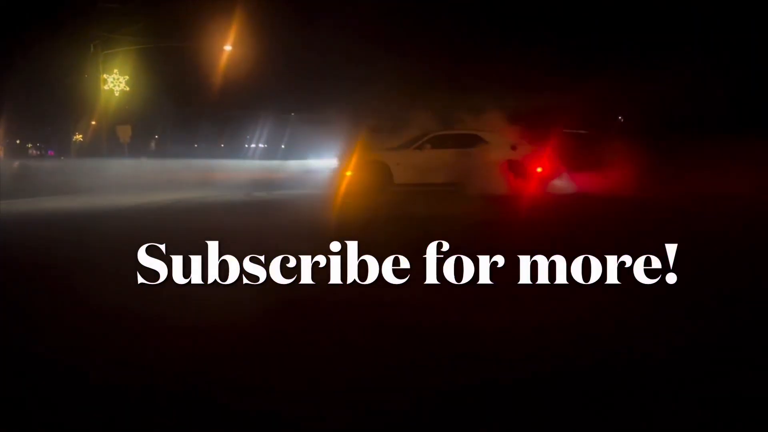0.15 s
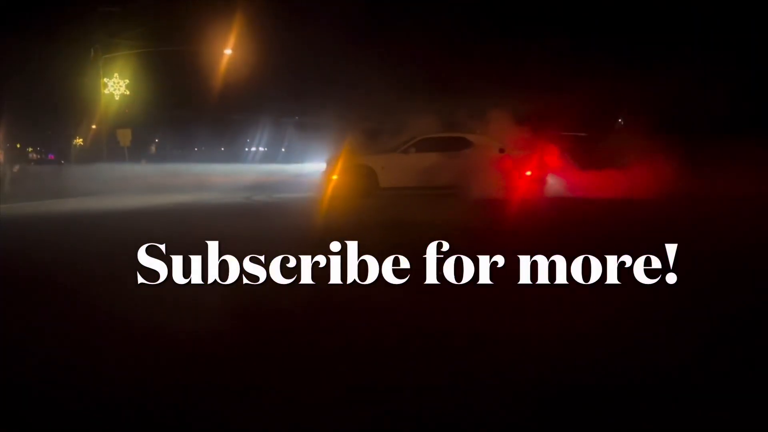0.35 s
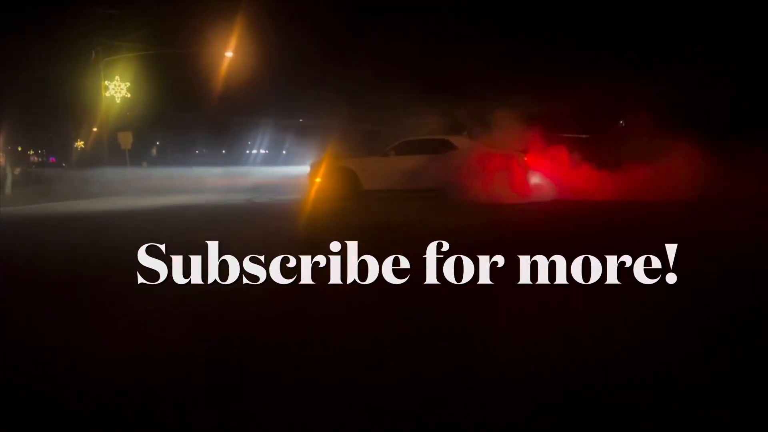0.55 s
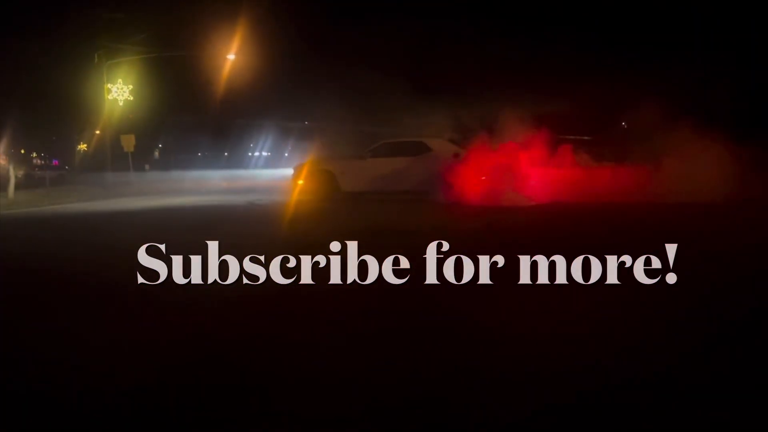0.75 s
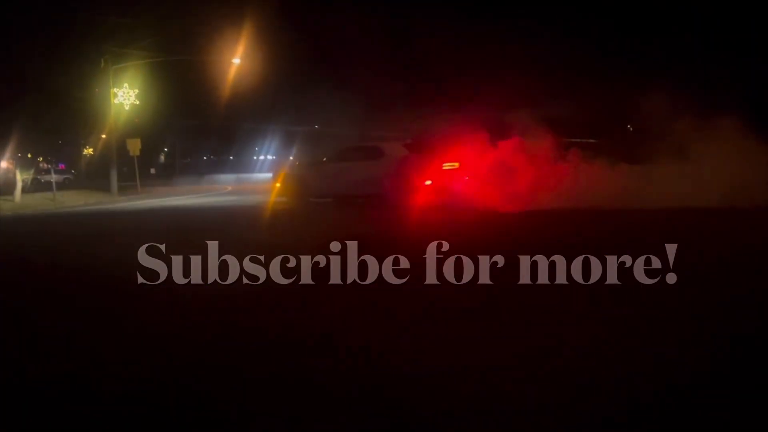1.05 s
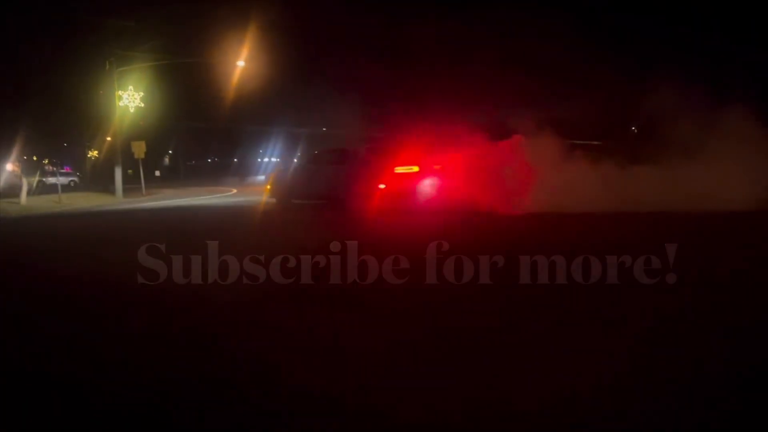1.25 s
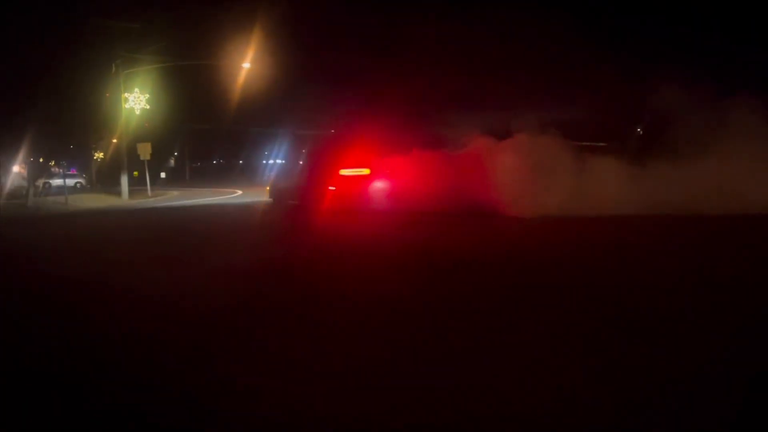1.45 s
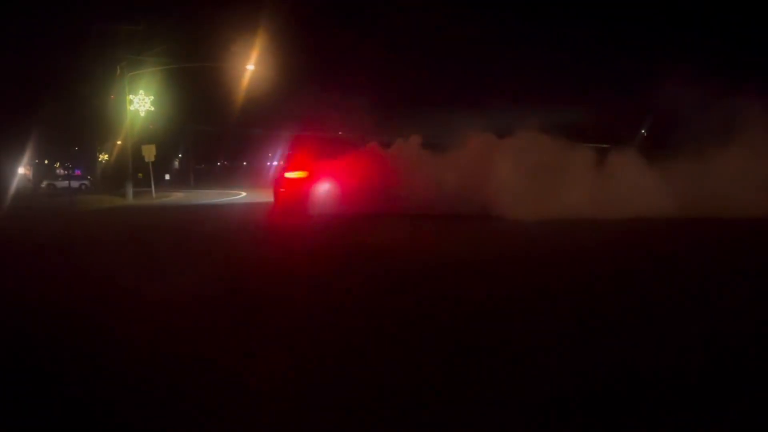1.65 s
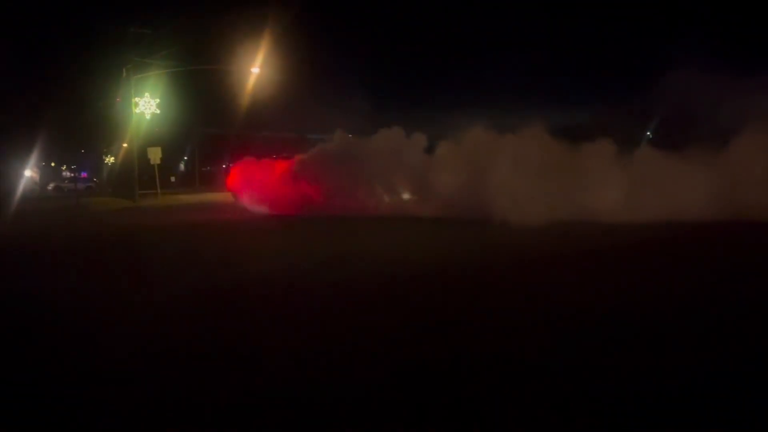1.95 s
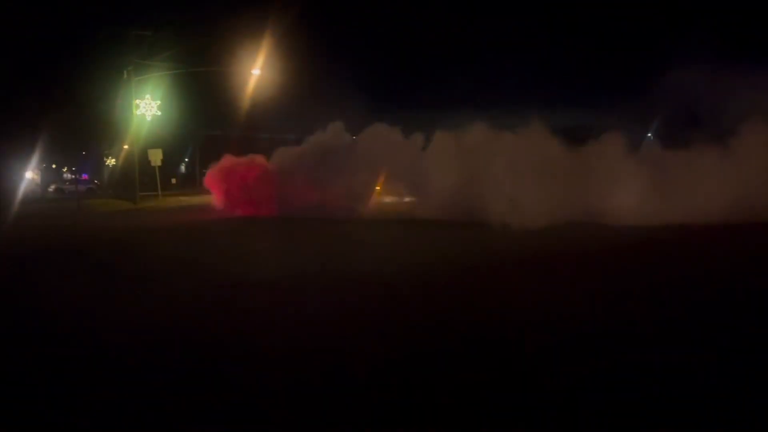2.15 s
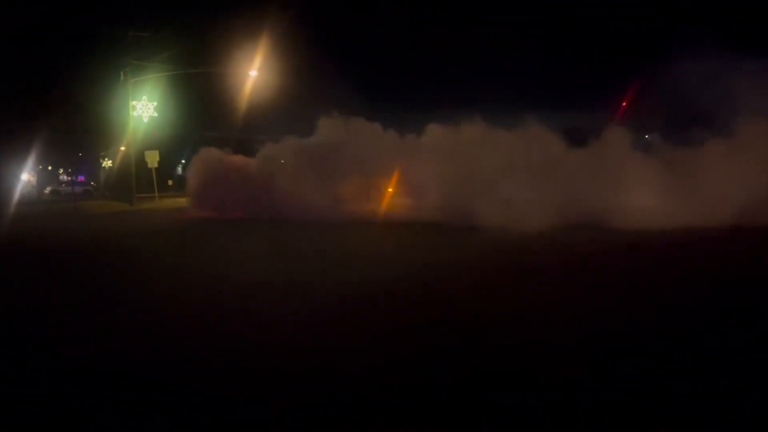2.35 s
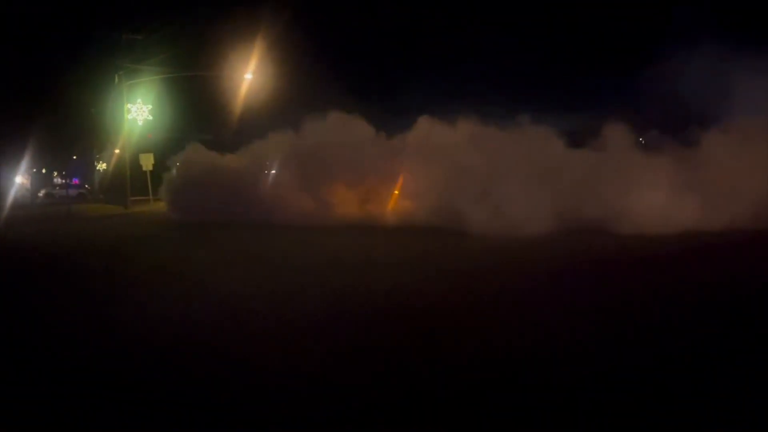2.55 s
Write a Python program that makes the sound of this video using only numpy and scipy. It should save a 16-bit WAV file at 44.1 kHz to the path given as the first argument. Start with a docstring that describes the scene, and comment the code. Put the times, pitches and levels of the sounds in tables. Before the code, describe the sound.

Loud V8 engine burnout with hissing, squealing tires, revs dropping to a deep boom, then climbing again

```python
"""A V8 vehicle does a burnout on a night street, some way from two microphones: summed exhaust lines and rasp puffs.
The revs sag with a low crank-rate throb, then hold; the tyres hiss (coloured noise) and squeal (hoarse wavering tones).
The vehicle slides off to the left; a tyre chirp (gliding tone) yelps as the throttle lifts.
The engine bogs down into a deep boom (pipe resonance) while the hiss fades, then the revs climb again.
Faint street noise lies under it all."""
import sys
import numpy as np
from scipy.fft import rfft, irfft, next_fast_len
from scipy.io import wavfile
from scipy.ndimage import map_coordinates

SR = 44100
rng = np.random.default_rng(int(sys.argv[2]) if len(sys.argv) > 2 else 0)


def digitize_waveform(pressure):
    """Quantize a signal to 16-bit integers and store it at the path in sys.argv[1].

    Rows of a 2-D input are taken as channels; values are limited to [-1, 1].
    """
    field = np.atleast_2d(pressure).T
    bounded = np.clip(field, -1, 1)
    quanta = np.round(bounded * 32767).astype(np.int16)
    wavfile.write(sys.argv[1], SR, quanta)


N = 119070

# engine speed: (time [s], mean firing rate [Hz])
FIRING_RATE_HZ = [(0, 394.2), (0.29, 413), (0.33, 396), (0.4, 353.5), (0.45, 315.4), (0.5, 296),
                  (0.6, 293.9), (0.71, 282.9), (1.19, 286.8), (1.3, 276.8), (1.46, 232.7), (1.53, 192.6),
                  (1.62, 158.7), (1.7, 146.2), (1.77, 146.2), (1.85, 151.4), (1.95, 171.1), (2.15, 212.4),
                  (2.25, 247.4), (2.45, 317), (2.55, 339.7), (2.62, 339.5), (2.7, 332.5)]
CYLINDERS = 8
# firing note before the pipe: (time [s], level [dB])
FIRING_NOTE_DB = [(0, -29), (.27, -26), (.48, -26.5), (.7, -28), (1.2, -28), (1.44, -50), (1.53, -56.5),
                  (1.62, -36.5), (1.78, -31.5), (1.92, -37), (2.05, -45), (2.2, -35), (2.33, -29),
                  (2.45, -21.5), (2.7, -35)]
# engine load, heard as burble: (time [s], level before the pipe [dB])
BURBLE_DB = [(0.0, -36.5), (0.27, -29), (0.4, -31.5), (0.6, -37), (0.75, -34), (1.1, -32.0), (1.3, -35.5),
             (1.48, -55.5), (1.85, -60), (2.1, -49), (2.3, -36.5), (2.45, -32.5), (2.55, -33), (2.63, -46),
             (2.7, -40.5)]
# exhaust lines on multiples 2, 3, 4 .. of the engine cycle, uneven from each bank: (relative level [dB])
LINE_DB = [1, 3.5, -4.5, .5, 1.5, -7.5, 0.5, 1, 3.5, -0.5, -1.5, -8.5, 2.5, 2, 0, 3.5, 6, -11.5, -8.5, 5.5,
           7, 3.5, -12.5, 8, 7]
# fixed exhaust pipe resonances: (frequency [Hz], gain [dB])
PIPE_GAIN_DB = [(50, 7), (75, 1), (110, 3.5), (135, -1), (160, -1.5), (195, 5.5), (228, -5), (255, 3.5),
                (275, 3), (305, 10), (355, 5.5), (390, -3), (425, -11), (460, 6), (500, -1), (560, -8),
                (600, 3), (640, 0.5), (700, -13), (800, -11.5), (1100, -17.5)]
# low exhaust resonance, strongest while the engine bogs down: (time [s], peak gain [dB])
DRONE_GAIN_DB = [(1.3, 0.5), (1.44, 24), (2.1, 24.5), (2.3, -3)]
DRONE_HZ, DRONE_WIDTH_HZ = 167.9, 38
# resonance that opens when the engine fires hard
BARK_MAX_DB, BARK_HZ, BARK_WIDTH_HZ = 11, 740, 74
# exhaust rasp: (time [s], rms level [dB])
RASP_LEVEL_DB = [(0, -29.5), (.25, -26), (.375, -22), (.55, -30), (.85, -33), (1.15, -29.5), (1.35, -37.5),
                 (1.55, -61.5), (1.9, -40.5), (2.2, -33), (2.45, -22.5), (2.56, -28), (2.7, -30.5)]
# rasp spectrum: (frequency [Hz], relative density [dB])
RASP_SPECTRUM_DB = [(50, -18), (200, -5), (330, 1.5), (430, -6), (660, -2), (900, -5), (1500, -6),
                    (3000, -22), (10000, -48)]
# low exhaust throb as the revs drop: (time [s], peak level [dB])
THROB_DB = [(.3, -26), (.43, -36), (.505, -16), (.54, -57.5)]
# tyre hiss before trim: (time [s], scrub level [dB], treble level [dB])
HISS_DB = [(0, -35, -41), (.55, -39, -43), (.95, -34, -40.5), (1.38, -32, -40), (1.7, -36.5, -49.5),
           (1.88, -52, -63), (2.1, -53, -59), (2.46, -45.5, -47.5), (2.7, -42.5, -55.5)]
SCRUB_TRIM_DB, TREBLE_TRIM_DB = 4.5, 4.5
# scrub spectrum: (frequency [Hz], relative density [dB])
SCRUB_SPECTRUM_DB = [(450, -19.5), (850, 1.5), (1600, -2), (2800, -3.5), (4300, -3), (5400, -9.5),
                     (8000, -24)]
# treble hiss spectrum: (frequency [Hz], relative density [dB])
TREBLE_SPECTRUM_DB = [(3500, -56), (6000, -2), (7000, -6.5), (8000, 1.5), (9800, -5.5)]
# tyre squeal: (time [s], centre pitch [Hz], level [dB])
SQUEAL_PITCH_LEVEL = [(0, 1149, -48.5), (.8, 1200, -43.5), (1.1, 1290, -29), (1.4, 1326, -35),
                      (1.55, 1246, -29.5), (1.92, 1199, -37.5), (2.1, 1177, -33), (2.7, 1175, -40)]
SQUEAL_WIDTH_HZ = 183
# brief tyre chirp: (time [s], mean pitch [Hz], fundamental level [dB])
CHIRP_PITCH_LEVEL = [(1.33, 695, -57), (1.37, 743, -23.5), (1.4, 780, -35), (1.44, 750, -79)]
# vehicle moved off to the left: (time [s], share [0-1])
OFF_AXIS_SHARE = [(.9, 0), (1.5, 0.46)]
# left microphone's lead for a source off to the left: (frequency [Hz], phase [rad])
LEFT_LEAD_RAD = [(150, -0.44), (550, -0.031), (800, 1.5), (1200, 0.9), (1900, 1.1), (2700, 1.9),
                 (5200, 2.77), (6500, 2.2)]
# distant street noise spectrum: (frequency [Hz], relative density [dB])
STREET_SPECTRUM_DB = [(20, -22), (150, -1), (450, -3.5), (900, 5.5), (9000, -53)]
STREET_DB = -39.5
# left minus right microphone: (frequency [Hz], level difference [dB])
LEFT_MINUS_RIGHT_DB = [(250, 1.1), (430, 1.4), (640, -6), (1000, 0), (1700, -1), (4300, 1)]
BAND_LIMIT_HZ = 9800


def amp(db):
    """Decibels to gain."""
    return 10 ** (np.asarray(db) / 20)


def unit(x):
    """Scale to rms 1."""
    return x / np.sqrt(np.mean(x ** 2) + 1e-20)


def along(points, hz):
    """Read (frequency [Hz], value) points on a log frequency axis."""
    f, v = np.transpose(points)
    return np.interp(np.log(hz + 1), np.log(f + 1), v)


def curves(rows):
    """One value per sample for each column after the time."""
    s, *cols = np.transpose(rows)
    return [np.interp(np.arange(N) / SR, s, c) for c in cols]


def wobble(knots_per_s):
    """Smooth random curve."""
    return map_coordinates(rng.standard_normal(4096), [np.arange(N) * knots_per_s / SR], mode="wrap")


def filtered(x, response):
    """Multiply the spectrum of x by a response of frequency [Hz]."""
    m = next_fast_len(N + SR // 4)  # padded against wrap-around
    return irfft(rfft(x, m) * response(np.fft.rfftfreq(m, 1 / SR)), m)[..., :N]


def noise(spectrum_db, side_db):
    """Coloured stereo noise of rms 1: a shared mid, plus and minus a side at side_db."""
    white = rng.standard_normal((2, N))
    mid, side = filtered(white, lambda hz: amp(along(spectrum_db, hz)))
    side = amp(side_db) * side
    return unit(np.array([mid + side, mid - side]))


def crank():
    """Rate [Hz] and phase [rad] of the four-stroke cycle, slightly unsteady."""
    unsteady_share = .0012
    hz = curves(FIRING_RATE_HZ)[0] / CYLINDERS * (1 + unsteady_share * wobble(22.8))
    return hz, 2 * np.pi * np.cumsum(hz) / SR


def pipe_db(hz):
    """Exhaust gain for a gliding line: fixed resonances, low drone, and a bark that opens under hard firing."""
    force = amp(curves(FIRING_NOTE_DB)[0])
    drone = curves(DRONE_GAIN_DB)[0] * np.exp(-((hz - DRONE_HZ) / DRONE_WIDTH_HZ) ** 2)
    bark_open = (force / force.max()) ** 2
    bark = BARK_MAX_DB * bark_open * np.exp(-((hz - BARK_HZ) / BARK_WIDTH_HZ) ** 2)
    return along(PIPE_GAIN_DB, hz) + drone + bark


def exhaust(hz, phase):
    """Firing note, overtones and burble lines glide through the pipe resonances; delays spread the blows."""
    flutter_db, smear_rad, dispersion_rad = 1.1, .011, .3 * np.pi
    firing_db, burble_db = curves(FIRING_NOTE_DB)[0], curves(BURBLE_DB)[0]
    out = np.zeros(N)
    for k, line_db in enumerate(LINE_DB, 2):
        # every eighth line is the firing note or its overtone
        source_db = burble_db if k % CYLINDERS else firing_db
        level_db = line_db + source_db + pipe_db(k * hz) + flutter_db * wobble(29.82)
        line_phase = k * (phase + smear_rad * wobble(21.73)) + dispersion_rad * k ** 2
        out += amp(level_db) * np.sin(line_phase)
    return out


def rasp(phase, firing_db=3.5, lope_db=2.0, scatter_db=1.5):
    """Gas noise leaves the pipe in puffs, one a firing, stronger from some cylinders."""
    puff_db = firing_db * np.cos(CYLINDERS * phase) + lope_db * np.cos(2 * phase) + scatter_db * wobble(250)
    puffs = amp(puff_db) * noise(RASP_SPECTRUM_DB, side_db=-21.5)
    return amp(curves(RASP_LEVEL_DB)[0]) * unit(puffs)


def throb(phase):
    """The crank-rate line (two turns a cycle) swells as the engine slows."""
    return amp(curves(THROB_DB)[0]) * np.sin(2 * phase)


def hiss(grain_db=0.58, sway_db=0.9, ahead_side_db=-22, widening_db=13):
    """Rubber scrubs over the pavement; off to the side it fades, treble most, and the scrub grows diffuse."""
    scrub_db, treble_db = curves(HISS_DB)
    scrub_side_db = ahead_side_db + widening_db * curves(OFF_AXIS_SHARE)[0]
    grain = amp(grain_db * wobble(350) + sway_db * wobble(24.74))
    scrub = amp(scrub_db + SCRUB_TRIM_DB) * noise(SCRUB_SPECTRUM_DB, scrub_side_db)
    treble = amp(treble_db + TREBLE_TRIM_DB) * noise(TREBLE_SPECTRUM_DB, side_db=-11.5)
    return grain * (scrub + treble)


def squeal(waver_hz=35, flutter_db=3, apart_share=.045, tone_db=-6):
    """Each rear tread sticks and slips at its own wavering pitch: a thin strand in a hoarse band."""
    hz, db = curves(SQUEAL_PITCH_LEVEL)
    out = np.zeros(N)
    for side in (-1, 1):
        tread_hz = hz * (1 + side * apart_share) + waver_hz * wobble(24)
        phase = 2 * np.pi * np.cumsum(tread_hz) / SR
        strand = amp(tone_db + flutter_db * wobble(18)) * unit(np.sin(phase))
        # low-passed noise pair shifted up to the tread's pitch
        a, b = filtered(rng.standard_normal((2, N)), lambda f: 1 / (1 + (f / SQUEAL_WIDTH_HZ) ** 2))
        hoarse = unit(a * np.cos(phase) + b * np.sin(phase))
        out += strand + hoarse
    return amp(db) * unit(out)


def chirp(octave_db=-4, waver_hz=10):
    """The tread bites for a moment as the throttle lifts: a short yelp, mostly rising, with its octave."""
    hz, db = curves(CHIRP_PITCH_LEVEL)
    phase = 2 * np.pi * np.cumsum(hz + waver_hz * wobble(90)) / SR
    started = np.arange(N) / SR > CHIRP_PITCH_LEVEL[0][0]
    return amp(db) * started * (np.sin(phase) + amp(octave_db) * np.sin(2 * phase))


def placed(x):
    """The two microphones fall out of phase as the vehicle moves left."""
    share = np.clip(curves(OFF_AXIS_SHARE)[0], 0, 1)
    aside = filtered(x, lambda hz: np.exp(1j * np.outer([.5, -.5], along(LEFT_LEAD_RAD, hz))))
    return (1 - share) * x + share * aside


def street():
    """Distant street: steady coloured noise."""
    return amp(STREET_DB) * noise(STREET_SPECTRUM_DB, side_db=-12.5)


def scene():
    """Engine and tyres, placed together, over the street."""
    hz, phase = crank()
    engine = exhaust(hz, phase) + rasp(phase) + throb(phase)
    tyres = hiss() + squeal() + chirp()
    return placed(engine + tyres) + street()


def record(dry):
    """The two microphones differ in colour; nothing is kept above the band limit."""
    def response(hz):
        split_db = np.outer([.5, -.5], along(LEFT_MINUS_RIGHT_DB, hz))
        return amp(split_db) * (hz < BAND_LIMIT_HZ)
    return filtered(dry, response)


dry = scene()
out = record(dry)
digitize_waveform(out)
```